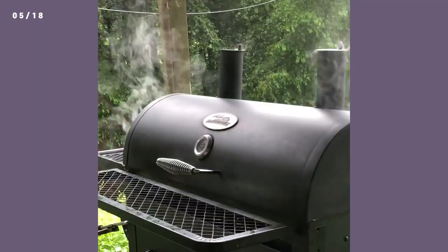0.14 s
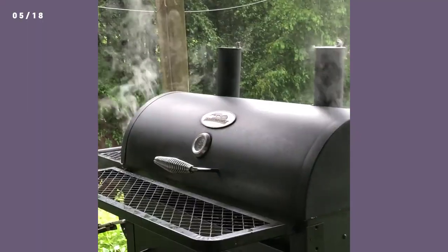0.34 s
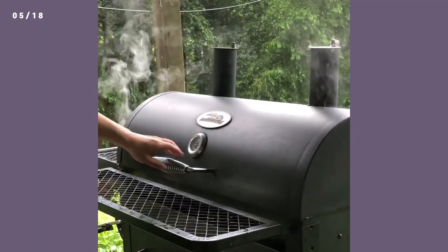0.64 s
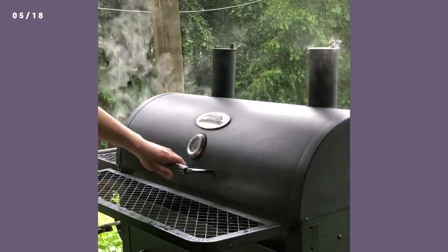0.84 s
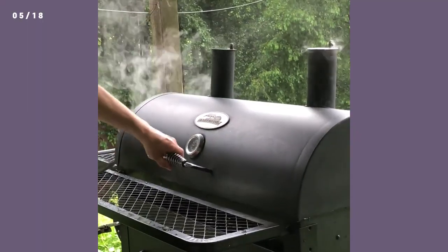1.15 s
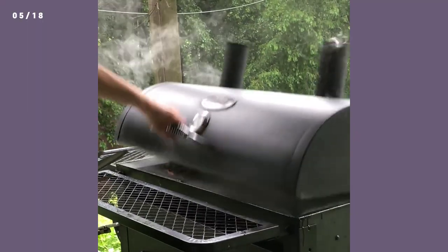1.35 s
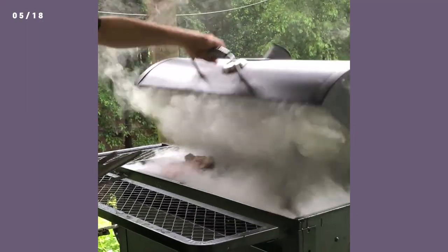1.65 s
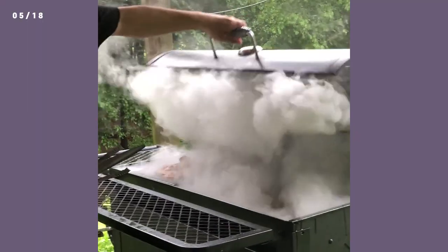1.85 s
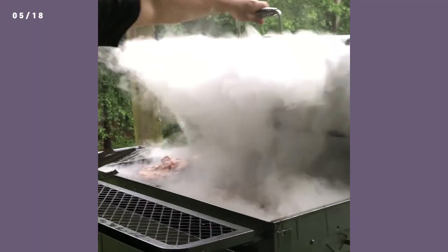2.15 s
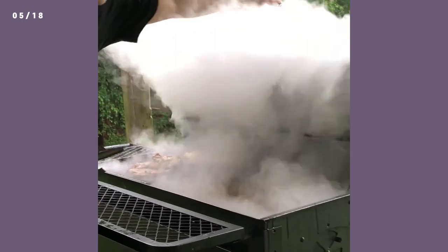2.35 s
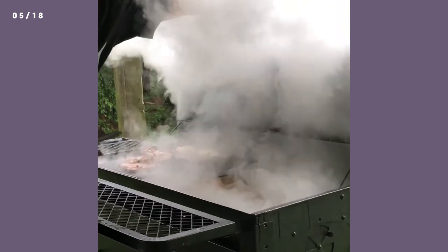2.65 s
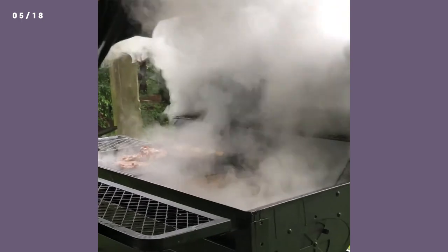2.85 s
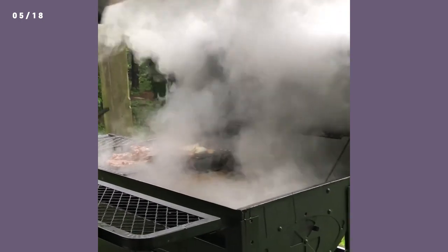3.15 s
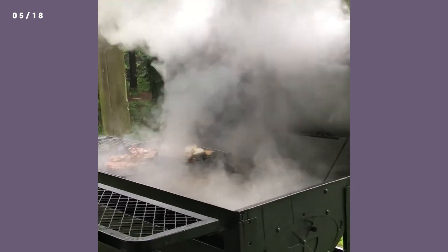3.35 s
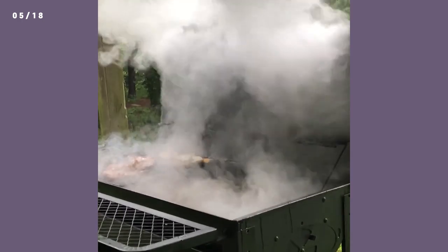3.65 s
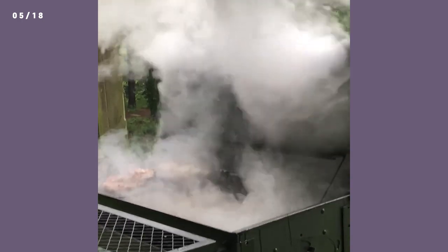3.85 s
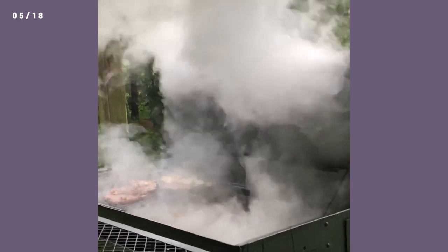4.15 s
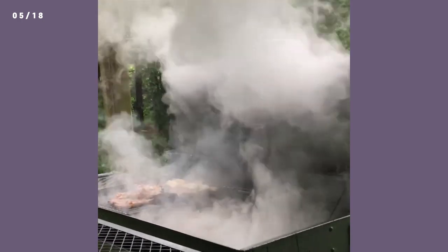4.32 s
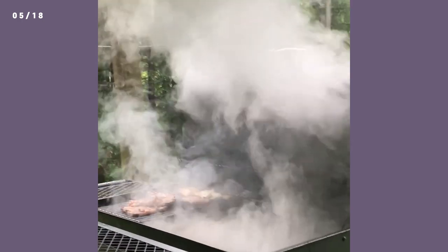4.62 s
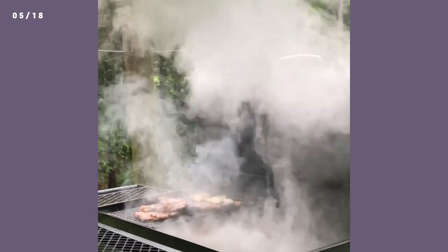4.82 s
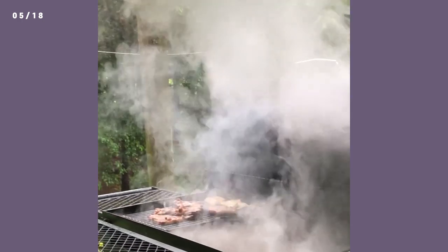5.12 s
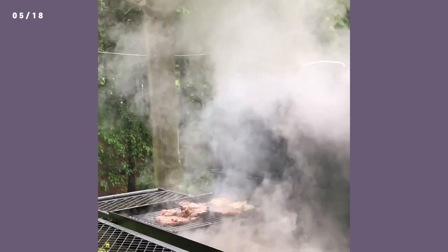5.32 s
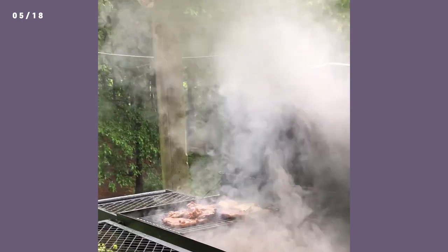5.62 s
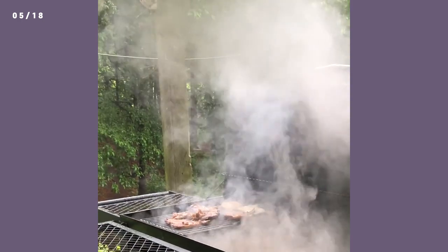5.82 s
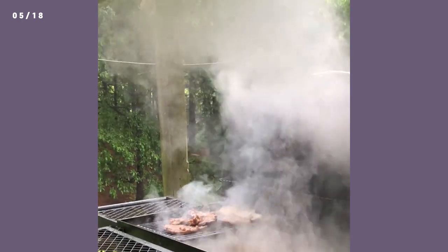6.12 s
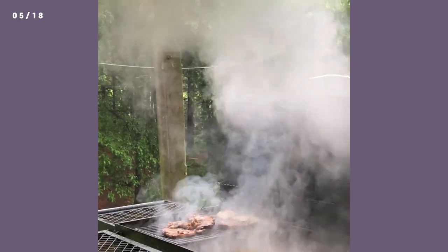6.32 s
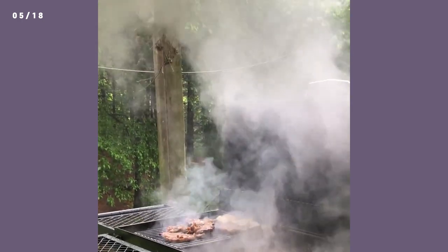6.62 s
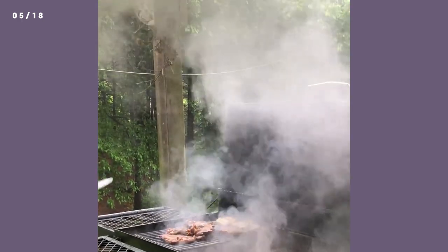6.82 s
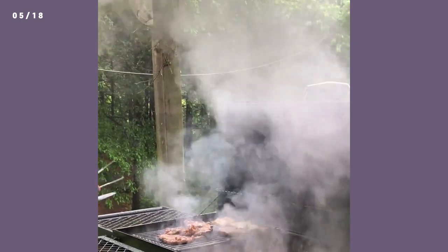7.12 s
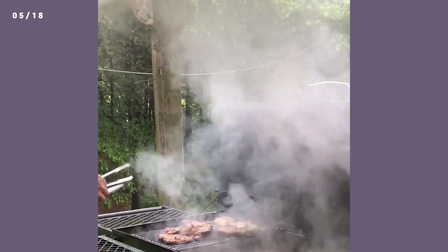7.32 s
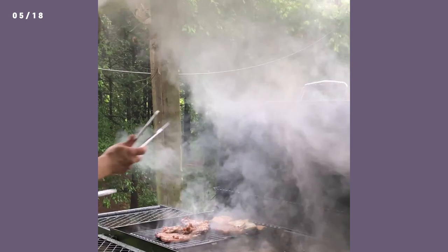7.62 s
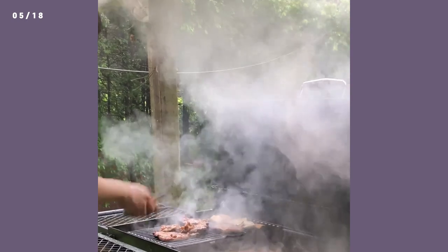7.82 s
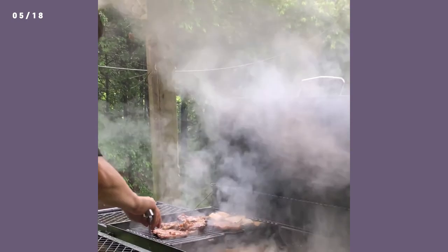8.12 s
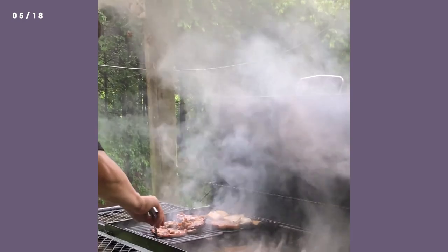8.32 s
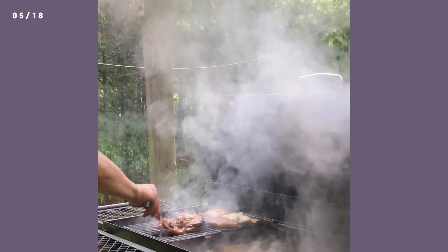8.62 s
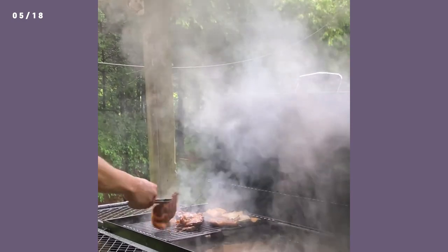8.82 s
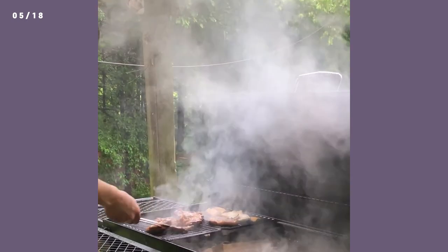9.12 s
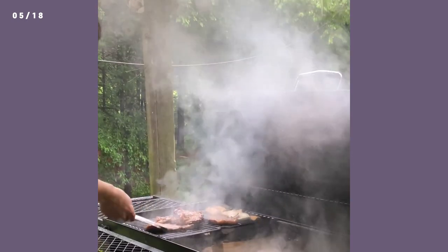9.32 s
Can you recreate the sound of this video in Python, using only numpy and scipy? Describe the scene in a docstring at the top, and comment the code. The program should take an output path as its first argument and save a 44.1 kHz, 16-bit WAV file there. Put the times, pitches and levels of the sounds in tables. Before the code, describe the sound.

A steel barrel grill's lid unlatches with a sharp clack, swings open with hollow booms, then tools knock and tongs clink over faintly popping coals.

```python
"""Barrel grill on a deck

A steel barrel grill outdoors: the lid is unlatched and swung open, tools knock on grate and shelf, tongs clink,
meat sizzles faintly over popping coals. Far traffic rumbles, a few birds call. One microphone hears it all.
Impacts are clicks driving decaying resonators plus dying noise, with short noisy bands for snaps and rattles;
groans and drags are noise through modes; whistles are gliding sines; thuds are falling sines; the background
hiss and the traffic are noise in third-octave bands."""
import sys
import numpy as np
from scipy import signal
from scipy.io import wavfile

SR = 44100
rng = np.random.default_rng(int(sys.argv[2]) if len(sys.argv) > 2 else 0)


def put_to_file(sound):
    """Save the sound as 16-bit audio at rate SR, in the file named by the first command-line argument."""
    columns = np.atleast_2d(sound).T  # one column per channel
    safe = np.clip(columns, -1, 1)
    whole_steps = np.round(safe * 32767)
    wavfile.write(sys.argv[1], SR, whole_steps.astype(np.int16))


N = 417186   # samples
THIRD_OCTAVE_EDGES_HZ = 25 * 2 ** np.arange(0, 9.5, 1 / 3)


def from_db(db):
    """Logarithmic levels: decibels to amplitude gain."""
    return 10 ** (np.asarray(db) / 20)


def rms_one(x):
    """Normalization: scale to rms 1."""
    return x / np.sqrt(np.mean(x ** 2) + 1e-20)


def at_hz(points, hz):
    """Spectral interpolation on a log-frequency axis."""
    points_hz, points_db = np.array(points)[:, 0], np.array(points)[:, 1]
    return np.interp(np.log(hz), np.log(points_hz), points_db)


def band(x, low_hz, high_hz):
    """Band-pass filtering: keep what lies between two frequencies."""
    sections = signal.butter(2, [low_hz, high_hz], "band", fs=SR, output="sos")
    return signal.sosfilt(sections, x + 1e-18)


def drift(rate_hz):
    """Low-passed chance: noise through a double pole at rate_hz, spread 1."""
    step = 40   # samples from one drawn value to the next
    pole = np.exp(-2 * np.pi * rate_hz * step / SR)
    noise = rng.standard_normal(N // step + 2002)
    slow = signal.lfilter([1], [1, -2 * pole, pole * pole], noise)[2000:]
    return np.interp(np.arange(N) / step, np.arange(len(slow)), rms_one(slow))


def ring(clicks, hz, t60_s):
    """Damped resonance: a unit click sets a sine of height 1 ringing."""
    radius = from_db(-60 / (t60_s * SR))
    angle = 2 * np.pi * hz / SR
    return signal.lfilter([0, np.sin(angle)], [1, -2 * radius * np.cos(angle), radius * radius], clicks + 1e-18)


def add(out, start_s, sound):
    """Superposition: mix a sound in at a moment."""
    i = round(start_s * SR)
    out[i:i + len(sound)] += sound[:N - i]


def dying(t60_s):
    """Exponential decay: an envelope that falls 60 dB in t60_s."""
    return from_db(-60 * np.arange(round(t60_s * SR)) / (t60_s * SR))


def rising(envelope, rise_s):
    """Gradual build-up: soften the start of an envelope with time constant rise_s."""
    return envelope * (1 - np.exp(-np.arange(len(envelope)) / (rise_s * SR)))


def held_db(start_s, held_s, level_db, rise_db_per_s, fall_db_per_s):
    """Linear ramps in decibels: a rise that ends at start_s, a hold, a fall."""
    t = np.arange(N) / SR - start_s
    return level_db - rise_db_per_s * np.maximum(-t, 0) - fall_db_per_s * np.maximum(t - held_s, 0)


def coloured(spectrum, source, patchy_db):
    """Band synthesis: third-octave bands, each with its own level and flicker; rms 1."""
    out, together = 0, drift(10.4)
    for k, (low, high) in enumerate(zip(THIRD_OCTAVE_EDGES_HZ, THIRD_OCTAVE_EDGES_HZ[1:])):
        if spectrum[0][0] < high and low < spectrum[-1][0]:
            flicker_db = patchy_db * (0.47 * together + drift(17))
            gain = from_db(at_hz(spectrum, np.sqrt(low * high)) + flicker_db)
            out = out + gain * band(source[k % 2], low, high)
    return rms_one(out)


# Spectrum of the far traffic, relative: frequency_hz [Hz], density_db [dB per Hz]
RUMBLE_SPECTRUM = [(12, -57), (20, -35), (30, -18), (54, 2), (74, -1), (92, -5), (182, -18.5), (250, -15),
                   (320, -48), (550, -120)]
RUMBLE_DB = -65.5


def rumble():
    """Broadband noise: random pressure with a bass-heavy spectrum is heard as far traffic."""
    return from_db(RUMBLE_DB) * coloured(RUMBLE_SPECTRUM, rng.standard_normal((2, N)), patchy_db=0.5)


# Level of background hiss over time, with faint tails of loud knocks: time_s [s], level_db [dB]
HISS_LEVELS = [(0.03, -57.5), (0.18, -61.5), (1.0, -61), (3.2, -58.5), (4.0, -59.5), (4.8, -61),
               (5.3, -56.5), (5.701, -60), (9.46, -61.5)]
# Spectrum of the hiss, relative: frequency_hz [Hz], density_db [dB per Hz]
HISS_SPECTRUM = [(88, -34), (150, 2), (356, -7), (434, -5.5), (518, -8), (814, -7), (3350, -9.5),
                 (8290, -16.5), (15300, -26), (16500, -41)]


def hiss():
    """Shot noise: dense tiny fat bursts, the sizzle, blend into the steady hiss of the woods."""
    sizes = from_db(2.2 * np.minimum(rng.exponential(1, N), 5)) * rng.choice([-1, 1], N)
    bursts_per_s = 400 * from_db(5 * drift(4))
    bursts = rms_one(sizes * (rng.random(N) < bursts_per_s / SR))
    source = rng.standard_normal((2, N)) + 0.056 * bursts
    level_db = np.interp(np.arange(N) / SR, *np.transpose(HISS_LEVELS))
    return from_db(level_db) * coloured(HISS_SPECTRUM, source, patchy_db=2.0)


# Whistles that slide upward: start_s [s], held_s [s], level_db [dB, before flutter and echoes],
# first_hz [Hz], last_hz [Hz], slide_s [s, time constant]
BIRD_CALLS = [(0.182, 0.082, -73, 7400, 7500, 0.071), (4.344, 0.14, -63, 4620, 4670, 0.025),
              (9.15, 0.085, -63, 7860, 8770, 0.14), (9.395, 0.07, -65.5, 7650, 8600, 0.11)]
BIRD_RISE_DB_PER_S, BIRD_FALL_DB_PER_S = 400, 220
WOODS_T60_S, WOODS_DB = 0.6, -3   # echoes of the trees


def birds():
    """Frequency and amplitude modulation: a sine trembles in pitch and level; the trees' echoes smear it."""
    out, tremble, flutter_db = np.zeros(N), drift(294), 5 * drift(70)
    for start_s, held_s, level_db, first_hz, last_hz, slide_s in BIRD_CALLS:
        slides = np.maximum((np.arange(N) / SR - start_s) / slide_s, -1)
        glide_hz = last_hz - (last_hz - first_hz) * np.exp(-slides)
        phase = 2 * np.pi * np.cumsum(glide_hz * (1 + 0.018 * tremble)) / SR
        call_db = held_db(start_s, held_s, level_db, BIRD_RISE_DB_PER_S, BIRD_FALL_DB_PER_S)
        out += from_db(call_db + flutter_db) * np.sin(phase)
    tail = dying(WOODS_T60_S)
    echoes = rng.standard_normal(len(tail)) * tail / np.sqrt(np.sum(tail ** 2))
    return out + from_db(WOODS_DB) * signal.fftconvolve(out, echoes)[:N]


# Louder pops of the coals: start_s [s], level_db [dB, before the band-pass]
COAL_POPS = [(0.601, -52.5), (1.394, -59), (4.82, -57), (4.927, -53), (4.973, -59), (5.906, -54),
             (6.137, -59), (6.629, -52), (7.094, -47)]
POPS_PER_S, POP_DB, POP_T60_S = 2, -64, 0.04   # rate and least level of random pops; decay of all pops


def coals():
    """Impulsive noise: each pop of a coal is a short bright puff that decays exponentially."""
    random_db = POP_DB + 2.0 * np.minimum(rng.exponential(1, N), 3)
    sizes = from_db(random_db) * (rng.random(N) < POPS_PER_S / SR)
    for start_s, level_db in COAL_POPS:
        sizes[round(start_s * SR)] = from_db(level_db)
    puffs = signal.lfilter([1], [1, -from_db(-60 / (POP_T60_S * SR))], sizes + 1e-18)
    return band(puffs * rng.standard_normal(N), 4700, 11700)


# One drag on the shelf: start_s [s], held_s [s], level_db [dB, before the slip noise joins the modes]
SHELF_DRAG = (4.93, 0.058, -58)
# Modes of the shelf: frequency_hz [Hz], width_hz [Hz], level_db [dB, relative]
SHELF_MODES = [(616, 16, 12), (980, 63, 12.5), (1210, 80, 9), (2300, 41, -12), (2740, 87, -8)]
DRAG_RISE_DB_PER_S, DRAG_FALL_DB_PER_S = 94, 74


def drag():
    """Friction excitation: something is dragged, and dense small slips ring the shelf."""
    slips = rng.standard_normal(N) * (rng.random(N) < 900 / SR)
    modes = sum(from_db(level_db) * rms_one(ring(slips, hz, 2.0 / width_hz))
                for hz, width_hz, level_db in SHELF_MODES)
    scrape = rms_one(band(slips, 560, 6200))
    level_db = held_db(*SHELF_DRAG, DRAG_RISE_DB_PER_S, DRAG_FALL_DB_PER_S)
    return from_db(level_db) * rms_one(rms_one(modes) + 0.73 * scrape)


# Short noisy bands, heard as snaps and humps of knocks and as rattles:
# start_s [s], held_s [s], level_db [dB], pitch_hz [Hz], width_hz [Hz]
SHORT_BANDS = [(1.1387, 0.0012, -19.5, 3140, 1290), (2.023, 0.012, -43, 1750, 900),
               (2.633, 0.0027, -48.5, 3000, 2400), (3.062, 0.025, -67, 5100, 324.1),
               (3.114, 0.038, -55.5, 5600, 378), (6.475, 0.0064, -42.5, 5360, 420),
               (8.242, 0.003, -47, 2900, 500), (8.312, 0.012, -59, 6300, 200),
               (8.405, 0.043, -59, 2980, 600)]
SHORT_RISE_DB_PER_S, SHORT_FALL_DB_PER_S = 6000, 802
CHATTER_PER_S = 6800   # touches per second, here and while the tools below rattle


def short_bands():
    """Contact chatter: dense touches pass through one broad resonance."""
    touches = rng.standard_normal(N) * (rng.random(N) < CHATTER_PER_S / SR)
    out = np.zeros(N)
    for start_s, held_s, level_db, hz, width_hz in SHORT_BANDS:
        level = from_db(held_db(start_s, held_s, level_db, SHORT_RISE_DB_PER_S, SHORT_FALL_DB_PER_S))
        out += level * rms_one(band(touches, hz - width_hz / 2, hz + width_hz / 2))
    return out


# Low rumbling of the barrel, tails of blows and groans of the lid:
# start_s [s], held_s [s], level_db [dB, before the band-pass]
BARREL_RUMBLINGS = [(1.2, 0.088, -48), (1.545, 0.02, -42.5), (1.68, 0.46, -56.5), (2.2, 0.019, -57),
                    (2.328, 0.015, -49), (2.464, 0.015, -53), (2.67, 0.088, -64)]
# Modes of the barrel: frequency_hz [Hz], level_db [dB, relative], t60_s [s, undamped; each player shortens it]
BARREL_MODES = [(110, 0.5, 0.51), (153.8, 3, 0.74), (181.7, 2, 0.55), (247, 6, 0.27), (287, -1.5, 0.71),
                (367, -24, 0.91), (387.6, 0.5, 0.39), (538, -12.5, 0.66), (813, -7, 0.23),
                (1026, -27, 0.21), (1350, -3.5, 0.24), (1788, -9, 0.22), (2160, -8, 0.15),
                (2440, -11, 0.18)]
RUMBLING_RISE_DB_PER_S, RUMBLING_FALL_DB_PER_S = 903, 310


def barrel_rumbling():
    """Random excitation of modes: uneven noise shakes the low modes of the barrel."""
    shaking = rng.standard_normal(N) * from_db(0.54 * drift(30))
    boom = sum(from_db(level_db) * rms_one(ring(shaking, hz, 0.57 * t60_s))
               for hz, level_db, t60_s in BARREL_MODES if hz < 600)
    level = sum(from_db(held_db(*row, RUMBLING_RISE_DB_PER_S, RUMBLING_FALL_DB_PER_S))
                for row in BARREL_RUMBLINGS)
    return band(level * rms_one(boom), 120, 910)


# Thuds of the buckling lid sheet: start_s [s], level_db [dB, relative], first_hz [Hz], last_hz [Hz], t60_s [s]
LID_THUDS = [(1.521, -30, 323, 156, 0.1), (1.569, -24, 453, 349, 0.087), (1.581, -17.5, 260, 166, 0.042),
             (1.603, -26.5, 218, 165, 0.14)]
THUD_DROP_S, THUD_RISE_S = 0.007, 0.0048   # time constants of pitch and onset
THUD_SHAKE_DB = 4   # the sheet shakes unevenly


def thuds():
    """Buckling: the sheet gives a sine that swells fast, drops in pitch and dies."""
    out = np.zeros(N)
    for start_s, level_db, first_hz, last_hz, t60_s in LID_THUDS:
        fade = rising(dying(t60_s), THUD_RISE_S)
        hz = last_hz + (first_hz - last_hz) * np.exp(-np.arange(len(fade)) / (THUD_DROP_S * SR))
        add(out, start_s, from_db(level_db + 2.0) * fade * np.sin(2 * np.pi * np.cumsum(hz) / SR))
    return out * from_db(THUD_SHAKE_DB * drift(40))


# Clinks of small tools: start_s [s], tool [0 tongs, 1 fork, 2 grate], ring_db [dB, relative],
# loudest_hz [Hz], crack_db [dB, relative], rattle_s [s, held within 0.001 to 0.1]
TOOL_CLINKS = [(4.4416, 1, -29.5, 6500, -40, 0.0095), (5.4374, 2, -44, 4100, -38, 0.0015),
               (5.4637, 2, -43.5, 7040, -35, 0.0012), (5.4871, 2, -39, 5500, -35, 0.00078),
               (5.5896, 0, -30.5, 9100, -40.5, 0.028), (5.614, 0, -33, 11800, -58, 0.018),
               (5.556, 0, -56, 8000, -70, 0.03), (5.715, 0, -44, 10000, -51, 0.064),
               (5.834, 0, -41, 11000, -62, 0.014), (5.847, 0, -43, 10300, -47, 0.013),
               (6.992, 0, -54, 7600, -46, 0.024), (8.2292, 2, -32.5, 7800, -55, 0.012),
               (8.3917, 2, -36, 6560, -54, 0.0092)]
# Modes of tongs, fork and grate: frequency_hz [Hz], level_db [dB, relative], t60_s [s, before the hand damps it]
TONGS_MODES = [(5130, -4.5, 0.28), (7000, -7, 0.19), (7600, -7, 0.11), (8840, -8, 0.066), (9500, -13, 0.11),
               (9900, -8, 0.14), (10300, -12, 0.41), (11650, -9, 0.26), (12690, -20, 0.15),
               (13220, -20, 0.2), (14070, -17, 0.09), (14900, -29, 0.14)]
FORK_MODES = [(3300, -7, .04), (6480, 6, 0.11), (6750, 1, 0.09), (7930, -3, 0.12), (9530, -1, 0.08),
              (9880, -1, 0.11), (11530, 1, 0.13), (12750, -9, .07), (13610, -5, .07)]
GRATE_MODES = [(2492, -29, .05), (3550, -24, 0.048), (4950, 2.5, 0.022), (6460, -2, 0.062),
               (7780, 1.5, .025), (9950, 4, 0.025), (12700, -14, .05)]
HAND_DAMPING = 0.35   # share of the free ring time
TWIN_RATIO = 1.007   # each mode has a weaker twin just above
DECK_ECHO_DB, DECK_T60_S = -25, 0.3   # echoes of the deck


def tools():
    """Modal excitation: a hard tick, then chatter; modes near loudest_hz ring loudest, damped by the hand."""
    out = np.zeros(N)
    for start_s, tool, ring_db, loudest_hz, crack_db, rattle_s in TOOL_CLINKS:
        held = round(np.clip(rattle_s, 0.001, 0.1) * SR)
        rattle = np.zeros(SR // 3)
        add(rattle, 0, np.append(np.linspace(1, 0.5, held), 0.5 * dying(0.025)))
        rattle *= (rng.random(SR // 3) < CHATTER_PER_S / SR) * np.sqrt(SR / CHATTER_PER_S)
        add(rattle, 0, from_db(DECK_ECHO_DB) * dying(DECK_T60_S))
        rattle *= rng.standard_normal(SR // 3)
        rattle[0] = 2   # the first tick
        sound = from_db(crack_db) * band(rattle, 1850, 4600)
        sound += from_db(ring_db - 8.0) * band(rattle, 5600, 14300)
        modes = [TONGS_MODES, FORK_MODES, GRATE_MODES][round(tool)]
        for (hz, level_db, t60_s), chance_db in zip(modes, rng.normal(0, 2, len(modes))):
            near_db = -6.0 * abs(np.log2(hz / loudest_hz))
            damped_s = HAND_DAMPING * t60_s
            pair = ring(rattle, hz, damped_s) + 0.5 * ring(rattle, TWIN_RATIO * hz, damped_s)
            gain = from_db(ring_db - 4.0 + level_db + near_db + chance_db)
            sound += gain * pair / np.abs(pair).max()
        add(out, start_s, sound)
    return out


# Knocks on steel and wood; the levels are relative, offset anew for each part of the sound:
# start_s [s], crack_db [dB], thump_db [dB], body_db [dB], edge_db [dB],
# t60_s [s, near 2 kHz, before limits], tone_hz [Hz, of the struck part], boom_hz [Hz]
KNOCKS = [(0.0983, -55, -44.5, -52, -76, 0.36, 940, 410),
          (0.9143, -49.5, -52.5, -48.5, -53.5, 0.48, 1560, 354),
          (0.9537, -49, -57, -52, -48.5, 0.16, 837, 398), (1.1, -30.5, -39, -36.5, -43, 0.15, 1440, 374),
          (1.137, -15.5, -21, -21, -21, 0.0688, 3420, 113), (1.2946, -53, -39, -52, -53, 0.12, 700, 285),
          (1.417, -48.5, -46, -57, -71, 0.13, 2420, 159), (1.512, -47.5, -56, -49, -55, 0.38, 1500, 275),
          (1.567, -45, -35, -56, -67, 0.11, 443, 424), (1.5739, -54, -21, -45, -55, 0.26, 803, 196),
          (1.6445, -32, -91, -32.5, -36.5, 0.13, 2580, 215), (1.733, -50, -52, -47, -54, 0.045, 1660, 170),
          (1.948, -57, -39.5, -41.5, -69, 0.23, 740, 281), (1.9824, -41.5, -46, -57, -47, 0.13, 820, 280),
          (2.0235, -44, -58, -39.5, -54, 0.88, 1430, 178), (2.135, -40, -36.5, -43, -38, 0.089, 870, 306),
          (2.3967, -44.5, -48, -59, -57, 0.12, 4400, 175), (2.6325, -43.5, -53, -45, -54, 0.25, 1610, 406),
          (2.7397, -38, -41, -35.5, -50.5, 0.14, 1310, 477),
          (2.834, -42.5, -65, -40, -43.5, 0.13, 1100, 137), (3.0553, -27, -32, -30, -36, 0.26, 844, 159),
          (3.0847, -58, -73, -23.5, -46, 0.051, 1150, 192), (3.114, -52.5, -40, -43.5, -43, 0.3, 2000, 146),
          (3.19, -58, -53, -48.5, -53, 1, 785, 180), (3.5355, -42.5, -57, -57, -55, 0.13, 1235, 250),
          (3.5861, -35.5, -51, -51, -44.5, 0.038, 3300, 278),
          (3.688, -45, -54, -46.5, -55, 0.16, 1360, 202), (4.004, -53.5, -72, -57, -54, 0.13, 2900, 175),
          (5.0897, -35, -41.5, -34, -38.5, 0.096, 2200, 350), (5.124, -49, -44, -43, -53, 0.23, 1470, 355),
          (5.1809, -31.5, -30, -26, -46, 0.093, 1320, 288),
          (5.326, -47.5, -51.5, -57, -66, 0.13, 1440, 253), (5.7884, -32.5, -36, -31, -45, 0.17, 1450, 172),
          (6.381, -46.5, -68, -49, -56, 0.1, 1050, 116), (6.4718, -36.5, -42, -38.5, -40, 0.16, 780, 380),
          (6.559, -44.5, -61, -45.5, -51, 0.13, 1280, 304), (6.669, -37, -51, -57, -42.5, 0.19, 2800, 108),
          (6.7122, -43, -40, -37.5, -56, 0.13, 1430, 392),
          (6.8988, -32.5, -39.5, -36.5, -39, 0.12, 887, 376),
          (7.057, -36, -46.5, -39, -51, 0.12, 1320, 277), (7.2288, -57, -41, -46.5, -59, 0.11, 574, 256),
          (7.35, -51, -87, -51, -49, 0.29, 1780, 110), (7.4341, -51, -51, -48.5, -54, 0.24, 1070, 406),
          (7.5661, -46, -40.5, -41, -52, 0.24, 1070, 404),
          (7.7193, -40, -42.5, -42.5, -46.5, 0.15, 1147, 340), (7.91, -75, -48.5, -48, -71, 0.2, 790, 168),
          (8.2295, -40, -44.5, -38.5, -33, 0.25, 650, 250), (8.295, -57, -58, -53.5, -62, 0.3, 1500, 394),
          (8.394, -48, -50, -44.5, -39.5, 0.22, 3030, 253), (8.574, -66, -53, -51, -57, 0.09, 1780, 362),
          (8.7795, -52.5, -47, -41, -68, 0.17, 760, 413),
          (8.8565, -46, -50.5, -44.5, -51.5, 0.38, 855, 186)]
BOOM_DB_PER_OCTAVE = 22   # low modes fade away from the boom


def barrel():
    """Modal resonance: each knock rings the barrel; of the low modes, those near the pushed spot win."""
    out, rows = np.zeros(N), np.array(KNOCKS)
    at = np.round(rows[:, 0] * SR).astype(int)
    thump_db, body_db, boom_hz = rows[:, 2], rows[:, 3], rows[:, 7]
    chance_db = rng.normal(0, 2.5, (len(rows), len(BARREL_MODES)))
    for k, (hz, level_db, t60_s) in enumerate(BARREL_MODES):
        low_db = thump_db - BOOM_DB_PER_OCTAVE * abs(np.log2(hz / boom_hz))
        struck_db = np.where(hz < 450, low_db, body_db)
        clicks = np.zeros(N)
        clicks[at] = from_db(struck_db + level_db - 11.5 + chance_db[:, k])
        # taking away a quickly dying copy lets the mode swell over a few cycles
        out += ring(clicks, hz, 0.85 * min(t60_s, 0.55)) - ring(clicks, hz, 2.4 / hz)
    return band(out, 63, 3200)


TONE_DB = -9.5   # tone under the blow


def struck_tones():
    """Narrow-band resonance: each struck part adds its own tone, a dying band of noise."""
    out = np.zeros(N)
    for start_s, crack_db, thump_db, body_db, edge_db, t60_s, tone_hz, boom_hz in KNOCKS:
        fade = dying(0.83 * np.clip(t60_s, 0.01, 0.3))
        tone = rms_one(band(rng.standard_normal(SR // 3), tone_hz * 0.95, tone_hz * 1.05))
        add(out, start_s, from_db(max(crack_db, body_db) + TONE_DB) * fade * tone[-len(fade):])
    return out


def knock_spectrum(crack_db, thump_db, body_db, edge_db):
    """Spectral envelope: the four levels of a knock spread over frequency."""
    return [(90, thump_db - 1), (180, thump_db - 5.0), (450, (thump_db + body_db) / 2 - 2.5), (950, body_db),
            (2700, crack_db), (3700, crack_db), (4700, (crack_db + edge_db) / 2 + 0.5),
            (8000, edge_db), (16000, edge_db - 4.5)]


SNAP_DB = 0.5   # the first contact of a knock is one clean click
GRAIN_DB, GRAINS_PER_S = 1, 72   # a knock is many uneven contacts


def plates():
    """High modal density: countless plate modes and near echoes die as noise, the treble first."""
    white, out = rng.standard_normal((2, N)), np.zeros(N)
    grain = from_db(GRAIN_DB * drift(GRAINS_PER_S))
    for k, (low, high) in enumerate(zip(THIRD_OCTAVE_EDGES_HZ[7:], THIRD_OCTAVE_EDGES_HZ[8:])):
        hz = np.sqrt(low * high)
        envelope, struck, snaps = np.zeros((3, N))
        contact = from_db(min(3, 6 * np.log2(hz / 1800))) * dying(0.0055)
        echoes = from_db(-15.5) * dying(0.33 * (hz / 2000) ** -0.25)
        for start_s, crack_db, thump_db, body_db, edge_db, t60_s, *tones in KNOCKS:
            level = from_db(at_hz(knock_spectrum(crack_db, thump_db, body_db, edge_db), hz))
            modes = from_db(-3.0) * dying(max(t60_s, 0.01) * (hz / 2000) ** -0.3)
            add(struck, start_s, level * contact)
            add(snaps, start_s, from_db(SNAP_DB) * level * contact[:1])
            add(envelope, start_s, level * rising(modes, 2.0 / hz))   # lows build up late
            add(envelope, start_s, level * echoes)
        blow = (struck + grain * envelope) * white[k % 2] + snaps
        out += from_db(-12.0) * band(blow, low, high) / np.sqrt((high - low) / (SR / 2))
    return out


def scene():
    """Linear superposition: all sources add at one microphone, sent alike to both channels."""
    background = rumble() + hiss() + birds() + coals()
    small_sounds = drag() + short_bands() + tools()
    grill = barrel_rumbling() + thuds() + barrel() + struck_tones() + plates()
    mono = background + small_sounds + grill
    return np.array([mono, mono])


START_S, CUTOFF_HZ = 0.02, 16600   # opening silence; start of the top cut's stop band


def record(dry):
    """Band limiting: after a short silence, the microphone loses the deep bass and the top is cut."""
    opened = dry * (np.arange(N) > START_S * SR)
    thin = signal.sosfilt(signal.butter(4, 36, "high", fs=SR, output="sos"), opened)
    return signal.sosfilt(signal.cheby2(14, 50, CUTOFF_HZ, fs=SR, output="sos"), thin)


dry = scene()
out = record(dry)
put_to_file(out)
```